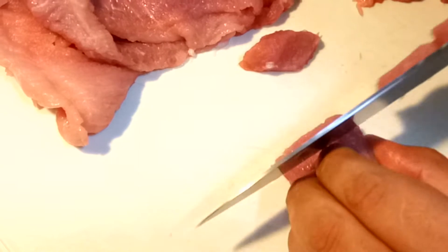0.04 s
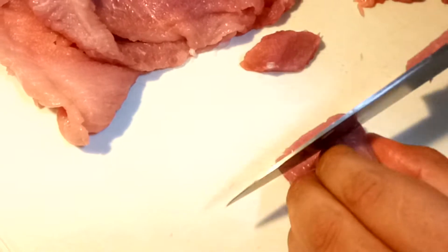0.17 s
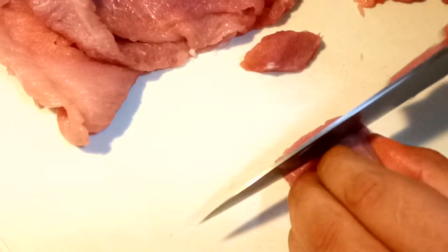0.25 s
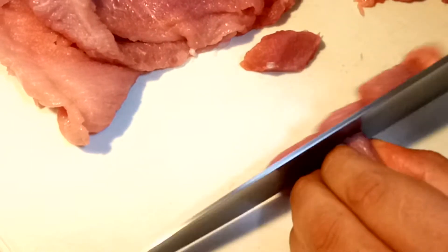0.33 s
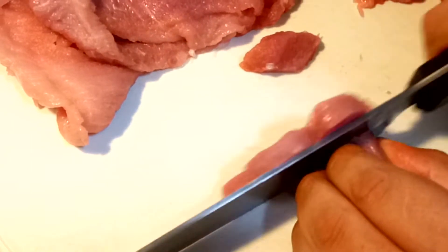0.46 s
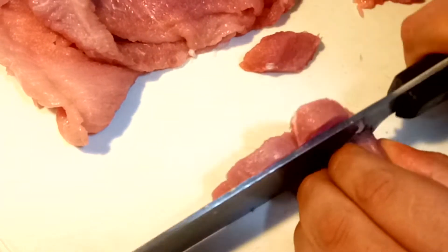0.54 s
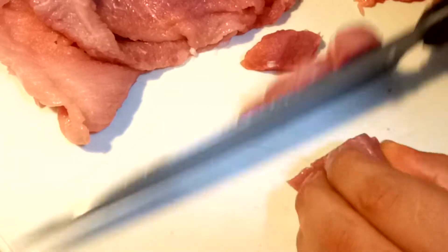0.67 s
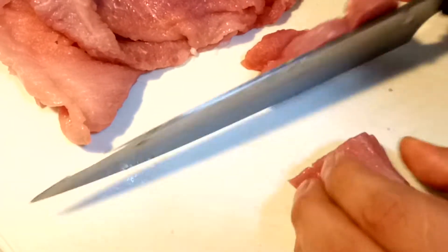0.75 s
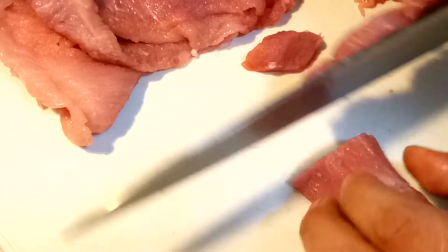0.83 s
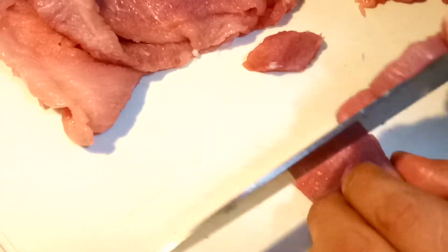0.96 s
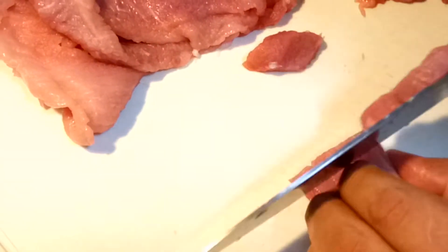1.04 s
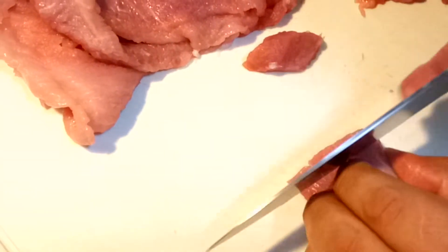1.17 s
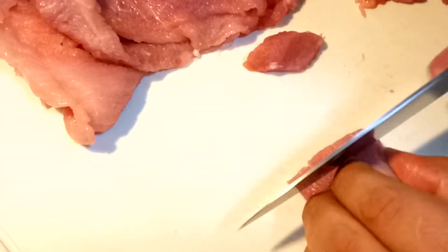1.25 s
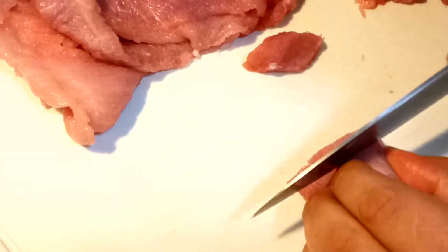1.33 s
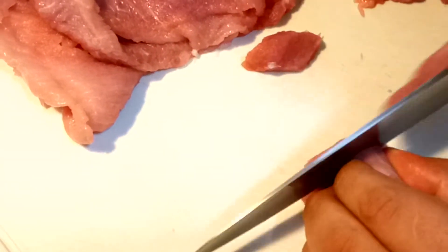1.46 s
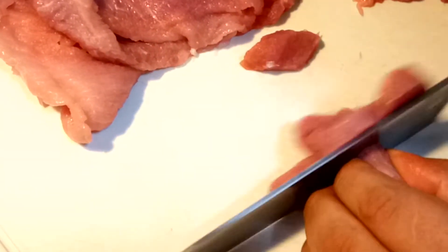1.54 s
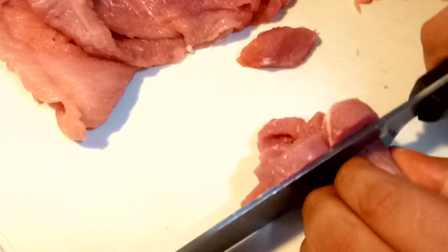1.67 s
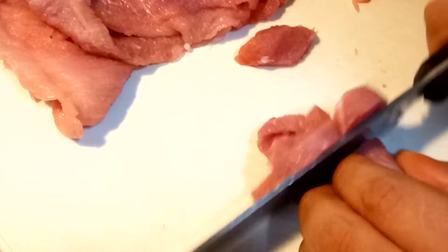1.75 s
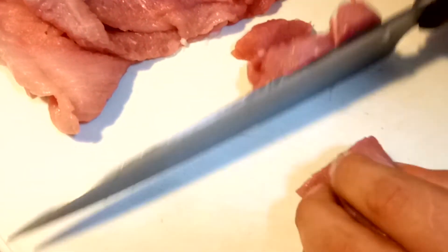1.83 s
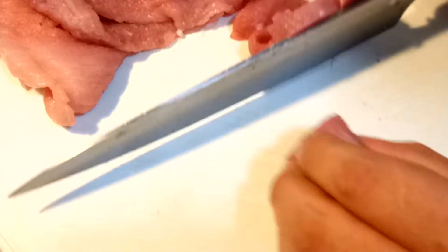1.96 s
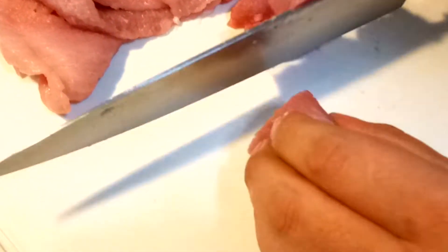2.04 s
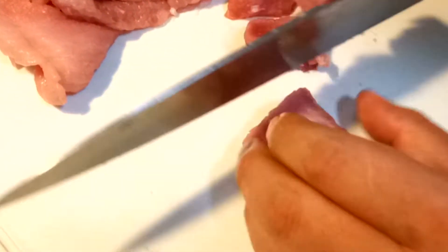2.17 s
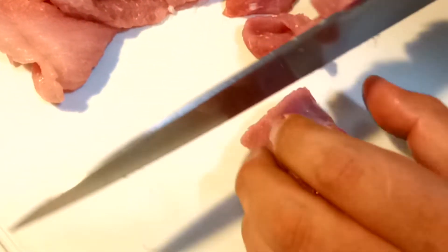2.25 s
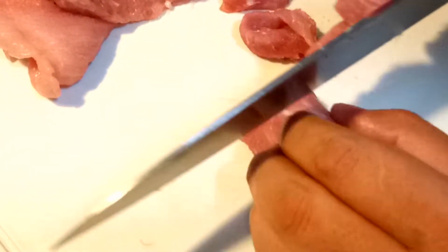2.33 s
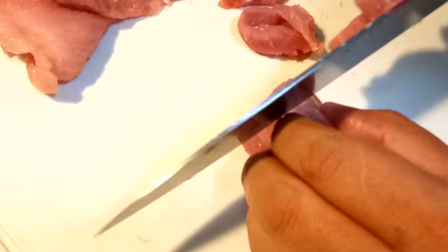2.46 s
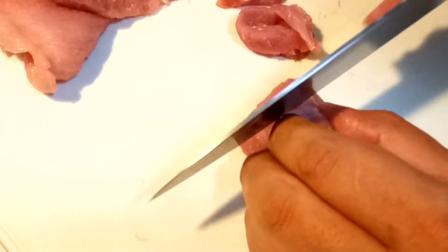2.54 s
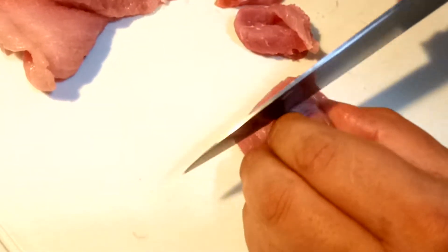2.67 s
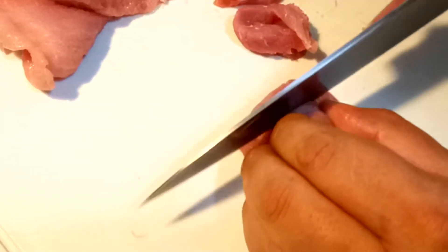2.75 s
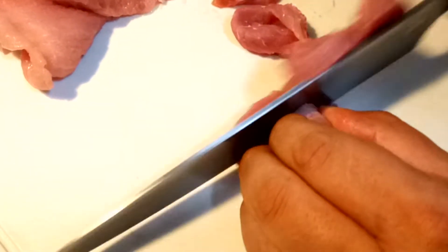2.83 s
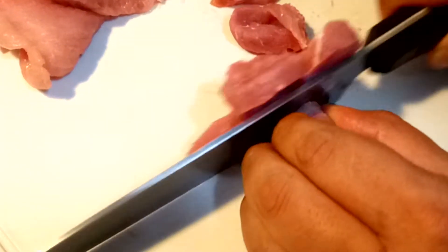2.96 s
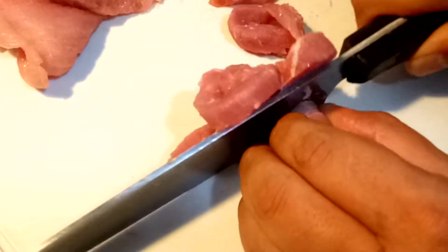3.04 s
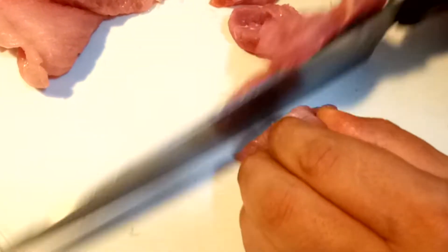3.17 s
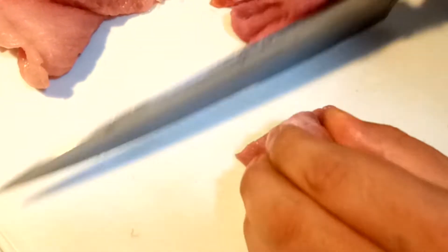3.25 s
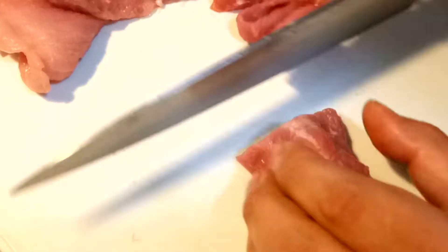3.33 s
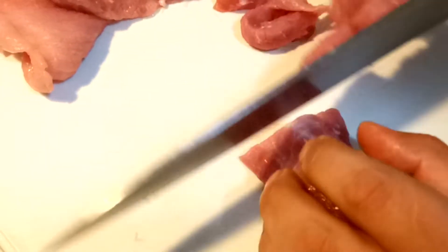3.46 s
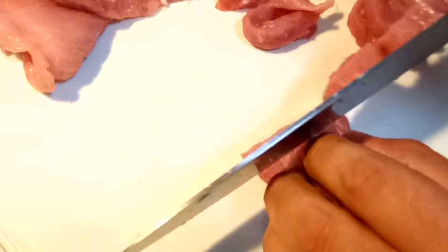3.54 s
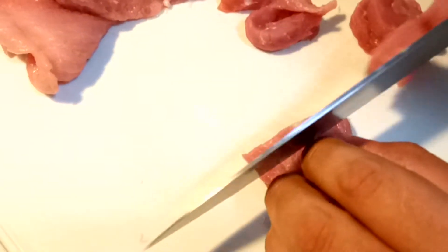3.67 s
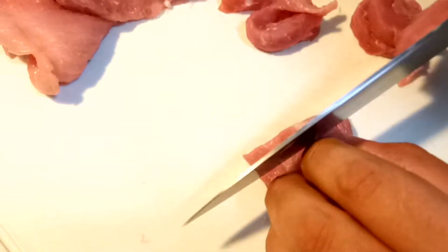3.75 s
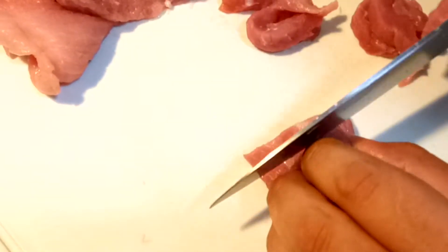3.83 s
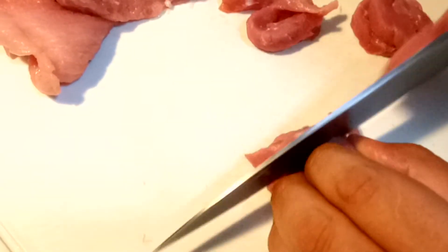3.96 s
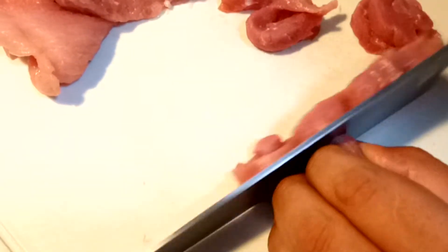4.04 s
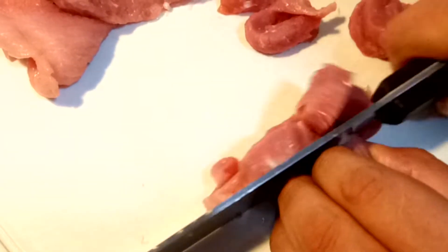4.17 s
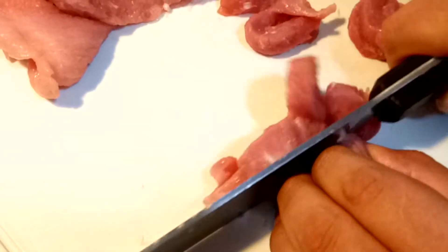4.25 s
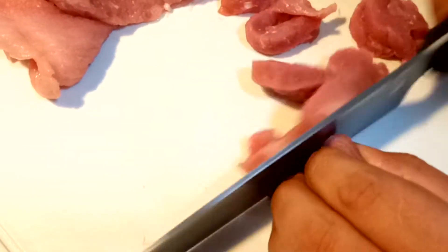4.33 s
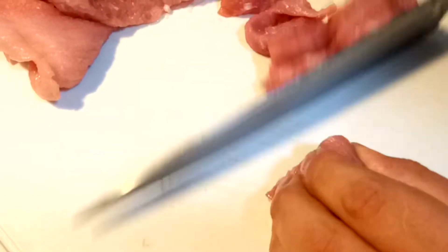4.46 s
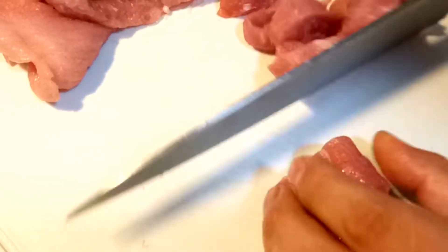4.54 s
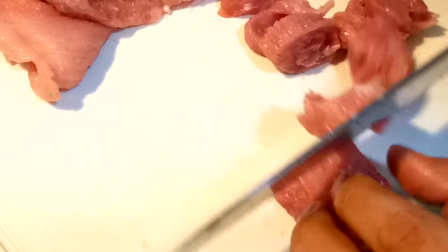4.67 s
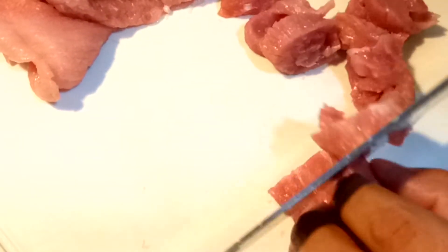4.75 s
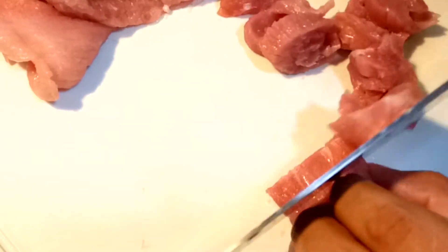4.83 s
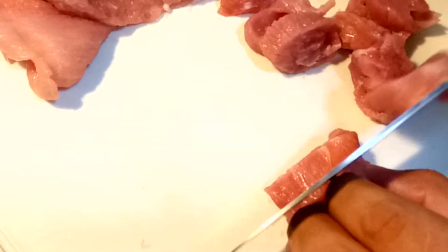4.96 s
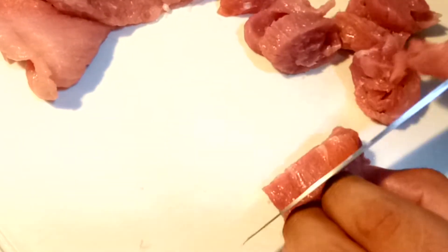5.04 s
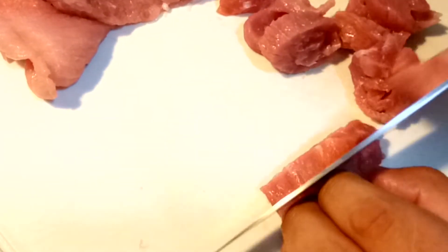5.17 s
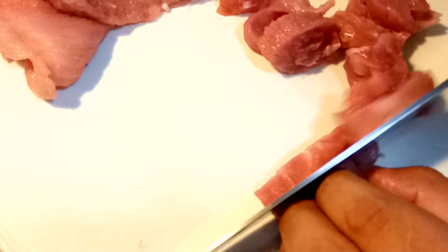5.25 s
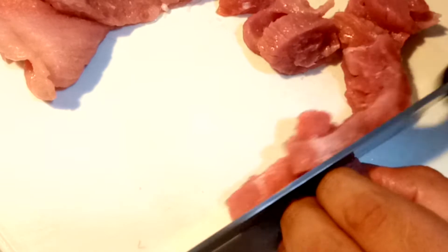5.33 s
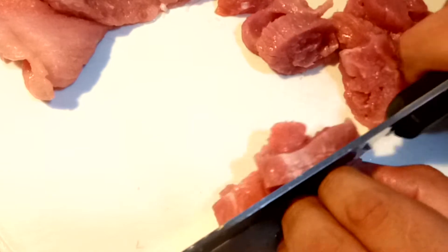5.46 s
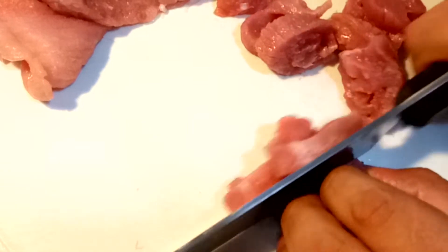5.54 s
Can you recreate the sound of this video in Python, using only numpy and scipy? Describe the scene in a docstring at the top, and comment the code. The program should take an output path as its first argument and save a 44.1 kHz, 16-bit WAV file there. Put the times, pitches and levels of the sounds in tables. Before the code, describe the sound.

Close-up of a knife cutting raw meat on a plastic board in a small hard-walled kitchen. Five evenly spaced strokes: a faint wet squeeze, a sharp knock with a weaker quick follow-up, a soft draw of the edge, then a loud rasping sideways scrape with tiny squeaks. The first three knocks are strong, the last two softer. Short bright reverberation, very faint hush.

```python
"""Knife slicing raw meat

A kitchen knife cuts five slices on a plastic board, close by, in a small hard-walled kitchen.
Each time the blade squeezes through wet meat, knocks on the board, is drawn along it, then scrapes sideways.
Rubs are noise from random slips, knocks short pushes, smacks damped noise bursts, squeaks rough narrow tones.
All pass through a decaying-noise room answer, over a faint steady hush."""
import sys
import numpy as np
from scipy import signal
from scipy.fft import rfft, irfft, next_fast_len
from scipy.io import wavfile
from scipy.ndimage import uniform_filter1d, map_coordinates

SR = 44100
rng = np.random.default_rng(int(sys.argv[2]) if len(sys.argv) > 2 else 0)


def bounce(signal):
    """Save signal as a 16-bit WAV file at the path given by the first command-line argument."""
    frames = np.transpose(np.atleast_2d(signal))
    limited = np.clip(frames, -1, 1)
    pcm = np.round(limited * 32767).astype(np.int16)
    wavfile.write(sys.argv[1], SR, pcm)


N = 246959

# Cuts, one a slice, a main knock and a weaker follow-up, barely there in the second cut:
# (landing [s], main knock peak [dB], delay of follow-up [s], its peak [dB],
# sinking time [s], rub level at full depth [dB], rub power of depth [-], drawing time [s], edge hiss [dB])
CUTS = [(0.321, -5, .032, -22.5, .108, -42.5, 0.56, .085, -42),
        (1.474, -3.5, .028, -26.5, .125, -38, 1.6, 0.088, -44),
        (2.832, -3, .024, -15.5, 0.17, -40.5, 1.3, .085, -43),
        (3.994, -12, .047, -16.5, 0.16, -40.5, 1.3, .108, -44),
        (5.244, -11, .060, -19, 0.12, -45, 0.59, .11, -42.5)]
# Sideways sweeps, one a slice: (set-down [s], tap peak [dB], creep before its growth [dB],
# time to full speed [s], time at full speed [s], board chatter [dB], blade rasp before top-end change [dB])
SWEEPS = [(0.511, -30, -56, 0.086, 0.029, -26, -25.5), (1.676, -23.5, -49, .058, 0.043, -30.5, -25.5),
          (3.031, -36.5, -44.5, 0.099, 0.038, -32.5, -25), (4.210, -32.5, -50, 0.14, .044, -29.5, -24),
          (5.499, -33, -44, 0.12, .04, -29.5, -24.5)]
# Snags of the scraping edge: (time [s], added rasp [dB])
SNAGS = [(0.5696, -34), (0.5861, -29), (1.711, -30.5), (1.7259, -29), (3.1201, -22), (3.1621, -30),
         (4.3329, -26), (4.36, -28), (4.4003, -22.5)]
# Loudest squeaks, edge locked to one resonance: (time [s], pitch [Hz], rms before the swell [dB])
SQUEAKS = [(0.594, 1934, -27), (0.598, 949, -23), (0.601, 3706, -31), (0.636, 3260, -31.5),
           (1.73, 1902, -26), (1.741, 4396, -29.5), (1.753, 792, -25), (3.147, 1306, -26.5),
           (3.17, 718, -28), (4.366, 3620, -24), (4.377, 817, -29), (4.389, 2358, -30.5)]
# Wet ticks of meat on steel and board, and one dull low bump at 3.896 s: (time [s], peak [dB],
# low ring [Hz], higher-ring setting [dB], length of following crackle [s])
SMACKS = [(0.2618, -47, 2195, -10.5, 0), (0.2925, -38.5, 2500, -10.5, 0),
          (0.5117, -35.5, 2230, -16.5, 0.0072), (1.0907, -49, 2270, -20, 0.0029),
          (1.27, -33, 2520, -13.5, 0.002), (1.2777, -37.5, 2650, -4.5, .08), (1.3508, -41.5, 2623, -7, 0),
          (1.3594, -40.5, 2620, -4.5, .02), (1.676, -24, 4440, -27, 0.0027), (2.3287, -49, 2060, -8, .03),
          (2.6734, -48.5, 2920, -14, 0.0096), (2.7612, -45.5, 3010, -14, 0.013),
          (2.778, -38, 2780, -12.5, 0.0025), (3.847, -51, 2735, -8.5, .07),
          (3.896, -37, 597, -14.5, 0.0079), (4.6989, -35.5, 4500, -29.5, 0), (5.1751, -37, 4450, 0, 0.011),
          (5.2304, -35.5, 2505, -6, 0.012)]
# Resonances of blade, board and room together: (centre [Hz], width [Hz], relative level [dB])
RINGS = [(236, 20, -10.5), (382, 27, 5), (480, 10, 5.5), (695, 75, 5.5), (970, 13, -2.5), (1380, 18, 1),
         (1590, 30, -13.5), (1963, 20, -6), (2580, 79, -5.5), (3000, 80, -10.5), (3286, 64, 2),
         (3650, 120, -4.5), (4464, 210, 0), (5480, 54, 1), (5990, 44, 0.5)]
# Colour of a hard knock on the board: (frequency [Hz], gain [dB])
THUD_COLOUR = [(30, -46.5), (70, -26), (180, -6), (500, 4), (950, 3), (1250, -10.5), (1600, -5.5),
               (2100, -13.5), (2700, -21), (3500, -23.5), (4300, -36), (6500, -51.5), (8000, -63),
               (15000, -75.5)]
# Colour of the dull rub in the meat: (frequency [Hz], gain [dB])
MEAT_COLOUR = [(30, -26.5), (100, -7), (220, 7.5), (340, -3.5), (700, 1), (1100, -8.5), (1700, -18),
               (4000, -46.5)]
# Colour of wet crackle and smack spray: (frequency [Hz], gain [dB])
WET_COLOUR = [(900, -34.5), (1800, -16), (2600, 1), (4000, 0), (6300, 2.5), (8000, -14), (9800, -16.5),
              (13500, -23), (15500, -21)]
# Colour of the board under the drawn edge: (frequency [Hz], gain [dB])
RUMBLE_COLOUR = [(30, -25), (90, -12.5), (180, -3.5), (400, -11), (750, -0.5), (1100, 1), (1500, -9.5),
                 (3000, -51)]
# Colour of the drawn edge: (frequency [Hz], gain [dB])
EDGE_COLOUR = [(600, -17.5), (1400, -2), (2200, 1.5), (3500, -2), (6500, -2.5), (7900, -19.5),
               (11500, -21.5), (13500, -25.5), (15000, -23.5)]
# Colour of the board under the sweep: (frequency [Hz], gain [dB])
CHATTER_COLOUR = [(15, -64), (40, -36), (90, -28), (190, -9.5), (300, -14), (480, -4), (620, -7),
                  (850, -0.5), (1150, -2.5), (1700, -11), (3500, -32.5)]
# Colour of the sweeping blade: (frequency [Hz], gain [dB])
RASP_COLOUR = [(600, -45), (1300, -1), (2000, 2.5), (3500, 0.5), (6400, 0.5), (7800, -12.5), (10000, -20),
               (13500, -20.5), (15000, -25.5)]
# Colour of the background hush: (frequency [Hz], gain [dB])
AIR_COLOUR = [(15, -50.5), (25, -22.5), (71, 0.5), (200, -0.5), (330, -5.5), (430, -7.5), (700, -10),
              (1700, -12.5), (4000, -13), (6300, -15.5), (8200, -27.5), (13500, -28.5), (15200, -23)]
# Decay of the kitchen: (frequency [Hz], t60 [s])
KITCHEN_T60 = [(150, .55), (1000, .6), (3000, .58), (6500, .52), (9000, .32), (15000, .25)]
# Colour of the room's answer: (frequency [Hz], gain [dB])
ECHO_COLOUR = [(60, -4.5), (250, -3), (800, -1.5), (2500, 1), (6500, -2.5), (9000, -5), (15000, -9.5)]

TOP_HZ = 15800
WET_DB, WET_POWER = -53, 1  # wet hiss at full depth; its power of depth
GRIP_S = 0.014  # the meat takes a moment to close round the blade
RUB_FALL_DB_PER_S, WET_FALL_DB_PER_S = 95.5, 101.5  # the meat relaxes after the landing
DRAW_RISE_S, DRAW_FALL_DB_PER_S = 0.017, 377
CREEP_RISE_S, CREEP_GROWTH_DB_PER_S = 0.017, 80  # a creeping edge slowly gathers speed
CREEP_CHATTER_DB = 2  # creep in the board relative to the blade
RASP_RISE_S, RASP_FALL_DB_PER_S = 0.022, 272
CHATTER_RISE_S, CHATTER_FALL_DB_PER_S = 0.032, 183.5
FULL_RASP_DB, TOP_GROWTH, TOP_EDGE_HZ = -23.5, 0.16, 7500  # a slower scrape is duller above this edge
FAINT_SQUEAK_DB = -6  # relative to the rasp of its sweep
CRACKLE_GAP_S, CRACKLE_DB = 0.011, -6.5  # smaller ticks after a smack
HIGH_RING_RATIO, TOP_RING_RATIO = 2.4, 3.7  # over the low ring
RING_WIDTH = 0.18  # share of the pitch


def amp(db):
    """Decibels to gain."""
    return 10 ** (np.asarray(db) / 20)


def unit(x):
    """x at rms 1."""
    return x / np.sqrt(np.mean(x ** 2) + 1e-20)


def along(points, hz):
    """(Hz, value) points read on a log-frequency axis."""
    f, v = np.transpose(points)
    return np.interp(np.log(hz + 1), np.log(f + 1), v)


def filtered(x, response):
    """x times a response of frequency."""
    m = next_fast_len(len(x) + 8192)
    spectrum = rfft(x, m) * response(np.fft.rfftfreq(m, 1 / SR))
    return irfft(spectrum, m)[:len(x)]


def resonance(f, hz, width_hz):
    """Response of one damped mode, 1 at its centre."""
    damping = 1j * f * width_hz
    return damping / (hz * hz - f * f + damping)


def ringing(f, ring_db):
    """Gain of the resonances of blade, board and room, standing on a flat base."""
    power = sum(np.abs(amp(db + ring_db) * resonance(f, hz, width_hz)) ** 2 for hz, width_hz, db in RINGS)
    return np.sqrt(1 + power)


def add(track, s, sound):
    """Mix a sound into a track at time s."""
    part = track[max(round(s * SR), 0):][:len(sound)]
    part += sound[:len(part)]


def stroke(s, rise_s, hold_s, fall_db_per_s):
    """Gain of one hand movement: swells to 1 at time s, holds, dies away."""
    t = np.arange(N) / SR - s
    swell = np.exp(-(np.minimum(t, 0) / rise_s) ** 2)
    return swell * amp(-fall_db_per_s * np.maximum(t - hold_s, 0))


def friction(colour, slips_per_s, scatter_db, judder_db, judder_hz, ring_db):
    """Tiny slips of random size, bunched by hand judder, coloured and ringing; rms 1."""
    slipping = rng.random(N) < slips_per_s / SR
    scatter = amp(scatter_db * np.clip(rng.standard_normal(N), -2, 2))
    slips = slipping * rng.standard_normal(N) * scatter
    judder = map_coordinates(rng.standard_normal(N // 20), [np.arange(N) * judder_hz / SR], mode="mirror")
    bunched = slips * amp(judder_db * judder)
    return unit(filtered(bunched, lambda f: amp(along(colour, f)) * ringing(f, ring_db)))


def patchy(x, depth_db):
    """The contact point wanders, so narrow bands come and go within a few hundredths of a second."""
    z = signal.stft(x, nperseg=512)[2]
    field = uniform_filter1d(rng.standard_normal(z.shape), size=3, axis=0)
    field = uniform_filter1d(field, size=6, axis=1)
    gain = amp(depth_db * np.clip(unit(field), -2, 2))
    return signal.istft(z * gain, nperseg=512)[1][:N]


def air():
    """Faint steady hush of room and microphone: coloured noise."""
    return amp(-67.5) * unit(filtered(rng.standard_normal(N), lambda f: amp(along(AIR_COLOUR, f))))


def kitchen(x, gap_s=0.003, tail_db=-11, near_db=-9, near_t60_s=0.073):
    """Counter and near walls answer briefly while board and room ring on, treble dying first."""
    hz, t, z = signal.stft(rng.standard_normal((2, SR)), SR, nperseg=256)
    tail_fall_db = -60 * t / along(KITCHEN_T60, hz)[:, None]
    near_fall_db = np.tile(-60 * t / near_t60_s, (len(hz), 1))
    tail, near = signal.istft(z * amp([tail_fall_db, near_fall_db]), SR, nperseg=256)[1]
    # levels set the energy before the echo colour
    answer = amp(tail_db) * tail / np.linalg.norm(tail) + amp(near_db) * near / np.linalg.norm(near)
    wet = signal.fftconvolve(x, np.pad(answer, (round(gap_s * SR), 0)))[:N]
    return filtered(wet, lambda f: amp(along(ECHO_COLOUR, f)) * ringing(f, ring_db=-9.5))


def ticks(scatter_db=3.0, spread=0.14):
    """(s, peak dB, low ring Hz, higher-ring dB) of each smack or bump and of its uneven crackle."""
    for s, db, hz, high_db, crackle_s in SMACKS:
        yield s, db, hz, high_db
        count = round(crackle_s / CRACKLE_GAP_S)
        for k, (early, size, gap) in enumerate(rng.uniform(-1, 1, (count, 3))):
            tick_s = s + (k + 1 + early / 2) * CRACKLE_GAP_S
            yield tick_s, db + CRACKLE_DB + scatter_db * size, hz * (1 + spread * gap), high_db


def smacks(t60_s=0.011, attack_s=0.00066, spray_db=-1, top_db=-9):
    """Juice film tears: a tiny burst rings three modes of its gap, in a broad spray; one is a dull bump."""
    out, t = np.zeros(N), np.arange(SR // 15) / SR
    for s, db, low_hz, high_db in ticks():
        burst = rng.standard_normal(len(t)) * amp(-60 * t / t60_s) * (1 - np.exp(-t / attack_s))
        low, high, top = [unit(filtered(burst, lambda f: resonance(f, hz, RING_WIDTH * hz) ** 2))
                          for hz in low_hz * np.array([1, HIGH_RING_RATIO, TOP_RING_RATIO])]
        spray = unit(filtered(burst, lambda f: amp(along(WET_COLOUR, f))))
        share = min(amp(high_db + 4.0), 1)
        tick = np.sqrt(1 - share ** 2) * low  # the low mode takes what the high one leaves
        tick = tick + share * (high + amp(top_db) * top)
        tick = tick + amp(high_db + spray_db) * spray
        add(out, s, amp(db) * tick / np.abs(tick).max())
    return out


def faint_squeaks(count=3, size=5):
    """(s, pitch Hz, dB): at full speed each sweep catches a few of the highest resonances by chance."""
    found = []
    for s, _, _, creep_s, hold_s, _, rasp_db in SWEEPS:
        for when, which in rng.random((count, 2)):
            hz = RINGS[-1 - int(which * size)][0]
            found.append((s + creep_s + when * hold_s, hz, rasp_db + FAINT_SQUEAK_DB))
    return found


def squeaks(swell_s=0.014, width_hz=75):
    """Slips fall in step with one mode: a rough, narrow tone swells and fades."""
    out, t = np.zeros(N), np.arange(-SR // 12, SR // 12) / SR
    for s, hz, db in SQUEAKS + faint_squeaks():
        # wandering phase widens the line
        drift = np.cumsum(rng.standard_normal(len(t))) * np.sqrt(2 * np.pi * width_hz / SR)
        tone = np.sin(2 * np.pi * hz * t + drift)
        tone = unit(filtered(tone, lambda f: resonance(f, hz, hz / 2)))
        add(out, s + t[0], amp(db) * tone * np.exp(-(t / swell_s) ** 2 / 2))
    return out


def sweep(snag_t60_s=0.015):
    """Pushed sideways the edge catches and skips, so the blade rasps and the board chatters."""
    t, chatter, rasp = np.arange(N) / SR, 0, 0
    for s, _, creep_db, creep_s, hold_s, chatter_db, rasp_db in SWEEPS:
        creep = stroke(s + CREEP_RISE_S, CREEP_RISE_S, creep_s, RASP_FALL_DB_PER_S)
        creep = creep * amp(creep_db + CREEP_GROWTH_DB_PER_S * np.clip(t - s, 0, creep_s))
        full_s = s + creep_s
        board_shove = amp(chatter_db) * stroke(full_s, CHATTER_RISE_S, hold_s, CHATTER_FALL_DB_PER_S)
        blade_shove = amp(rasp_db) * stroke(full_s, RASP_RISE_S, hold_s, RASP_FALL_DB_PER_S)
        chatter = chatter + np.hypot(amp(CREEP_CHATTER_DB) * creep, board_shove)
        rasp = rasp + np.hypot(creep, blade_shove)
    for s, db in SNAGS:  # a snag lets go: the rasp jumps, then decays
        add(rasp, s, amp(db - 60 * t[:SR // 15] / snag_t60_s))
    board = friction(CHATTER_COLOUR, slips_per_s=6000, scatter_db=2.5, judder_db=-2.07, judder_hz=130,
                     ring_db=-0.5)
    blade = friction(RASP_COLOUR, slips_per_s=6500, scatter_db=-2.0, judder_db=1.37, judder_hz=170,
                     ring_db=0.0)
    blade = unit(patchy(blade, depth_db=3.5))
    top = filtered(blade, lambda f: 1 / (1 + (TOP_EDGE_HZ / (f + 1)) ** 8))
    blade = blade - top + top * (rasp / amp(FULL_RASP_DB)) ** TOP_GROWTH
    return chatter * board + rasp * blade


def draw(rumble_db=5, full_db=-43, growth=0.69):
    """After landing, the edge slides lengthwise in its groove and the board rumbles under it."""
    hiss = 0
    for s, *_, draw_s, db in CUTS:
        hold_s = draw_s - DRAW_RISE_S
        hiss = hiss + amp(db) * stroke(s + DRAW_RISE_S, DRAW_RISE_S, hold_s, DRAW_FALL_DB_PER_S)
    rumble = amp(full_db + rumble_db) * (hiss / amp(full_db)) ** growth  # grows less with speed than the hiss
    board = friction(RUMBLE_COLOUR, slips_per_s=3500, scatter_db=-3.9, judder_db=2.5, judder_hz=93, ring_db=2)
    edge = friction(EDGE_COLOUR, slips_per_s=8200, scatter_db=3.5, judder_db=1.7, judder_hz=160, ring_db=-5.5)
    return rumble * board + hiss * edge


def press():
    """Meat muffles the blade: a dull rub and fine wet crackle grow with the depth of the cut."""
    t, rub, hiss = np.arange(N) / SR, 0, 0
    for s, _, _, _, sink_s, rub_db, power, *_ in CUTS:
        depth = np.clip(1 + (t - s) / sink_s, 0, 1)
        after_s = np.maximum(t - s, 0)
        grip = 1 - np.exp(-depth * sink_s / GRIP_S)
        rub = rub + grip * depth ** power * amp(rub_db - RUB_FALL_DB_PER_S * after_s)
        hiss = hiss + grip * depth ** WET_POWER * amp(WET_DB - WET_FALL_DB_PER_S * after_s)
    dull = friction(MEAT_COLOUR, slips_per_s=2800, scatter_db=-3.0, judder_db=0.5, judder_hz=170, ring_db=1.5)
    wet = friction(WET_COLOUR, slips_per_s=21000, scatter_db=-3.0, judder_db=2.0, judder_hz=140, ring_db=3.5)
    return rub * dull + hiss * wet


def blows():
    """(s, peak dB): a main knock and a weaker follow-up a cut, barely there in the second; a tap a sweep."""
    mains = [(s, db) for s, db, *_ in CUTS]
    follow_ups = [(s + after_s, db) for s, _, after_s, db, *_ in CUTS]
    taps = [(s, db) for s, db, *_ in SWEEPS]
    return mains + follow_ups + taps


def knocks(lag_hz=380, travel_s=0.00064, softening=0.61, hard_db=-5):
    """The edge hits the board, which the meat damps to a single short push."""
    size, out = 4096, np.zeros(N)
    f = np.fft.rfftfreq(size, 1 / SR)
    octaves = np.clip(np.log2((f + 1) / 900), 0, 1.5)
    fold = np.r_[1, np.full(size // 2 - 1, 2), np.zeros(size // 2)]
    for s, db in blows():
        # a lighter blow is duller
        colour_db = along(THUD_COLOUR, f) + softening * max(db - hard_db, -12) * octaves
        cepstrum = irfft(np.log(amp(colour_db)))
        causal = np.exp(rfft(cepstrum * fold))  # minimum phase
        lag = (lag_hz - 1j * f) / (lag_hz + 1j * f)  # low bending waves cross the board more slowly
        push = irfft(causal * lag)
        add(out, s + travel_s, amp(db) * push / np.abs(push).max())
    return out


def scene():
    """All the knife's sounds in the kitchen, over the hush."""
    knife = smacks() + squeaks() + sweep() + draw() + press() + knocks()
    return (air() + kitchen(knife) + knife)[None]


def record(dry):
    """Band limit: nothing at or above TOP_HZ passes."""
    return filtered(dry[0], lambda f: f < TOP_HZ)[None]


dry = scene()
out = record(dry)
bounce(out)
```